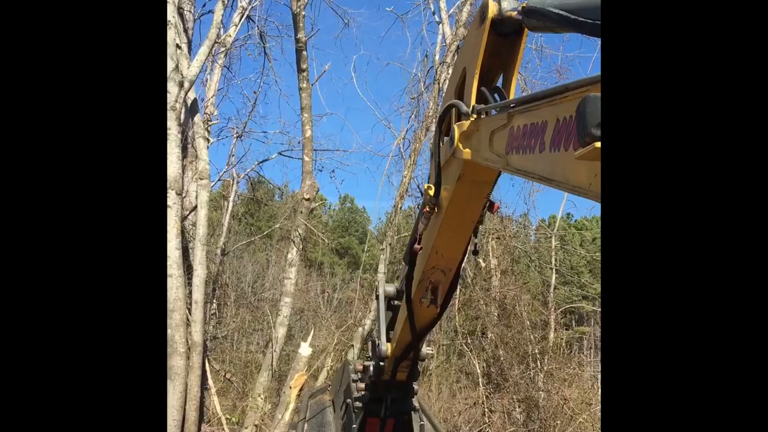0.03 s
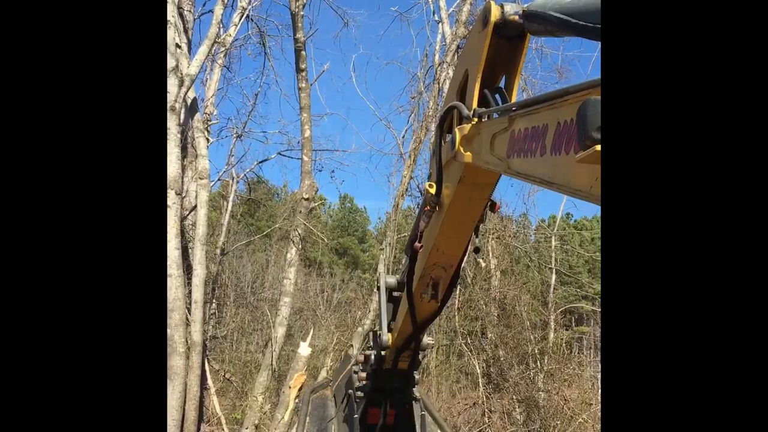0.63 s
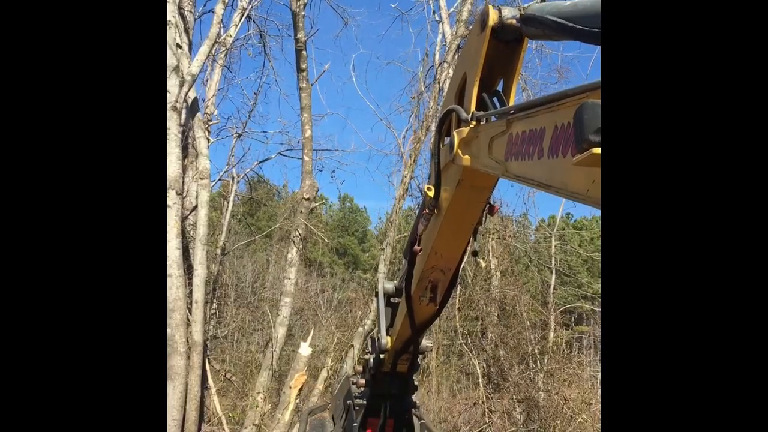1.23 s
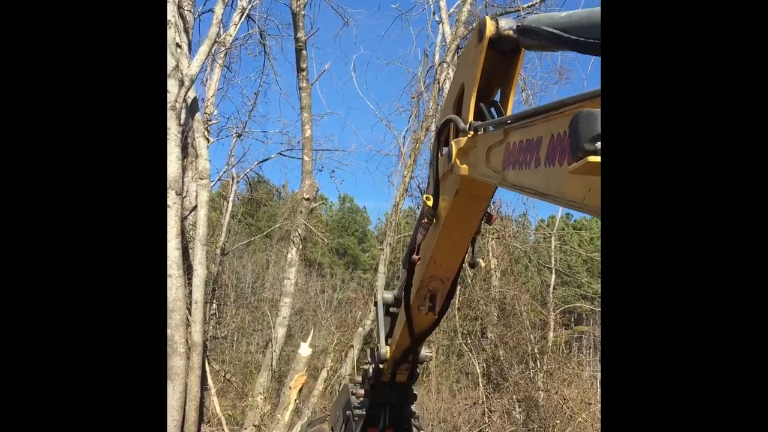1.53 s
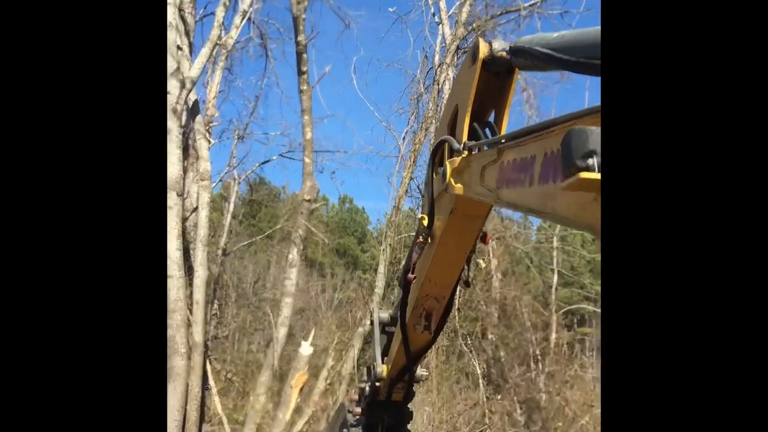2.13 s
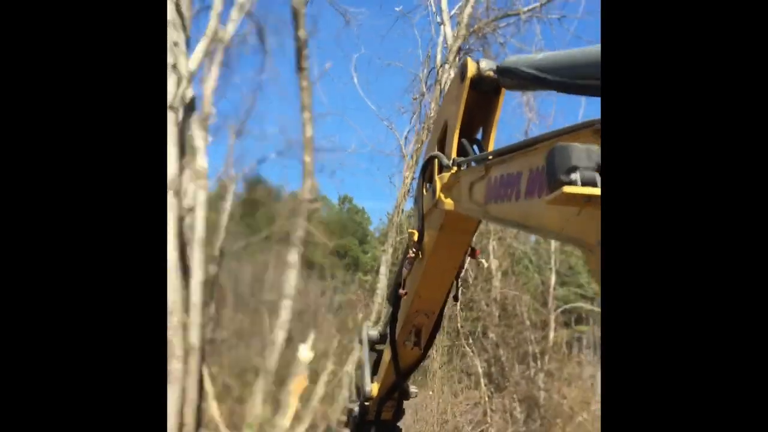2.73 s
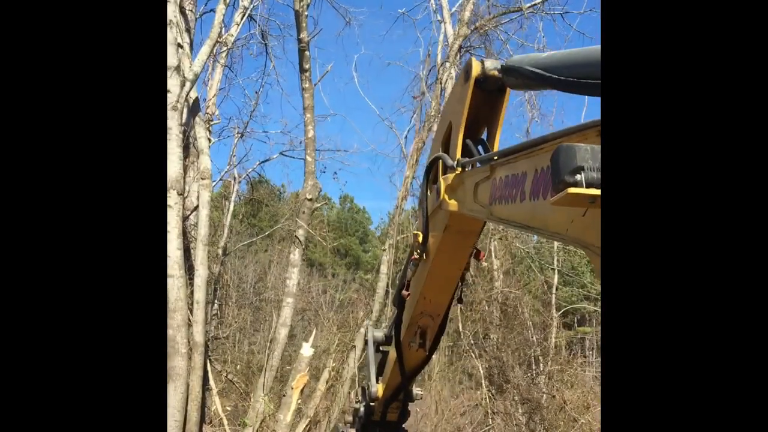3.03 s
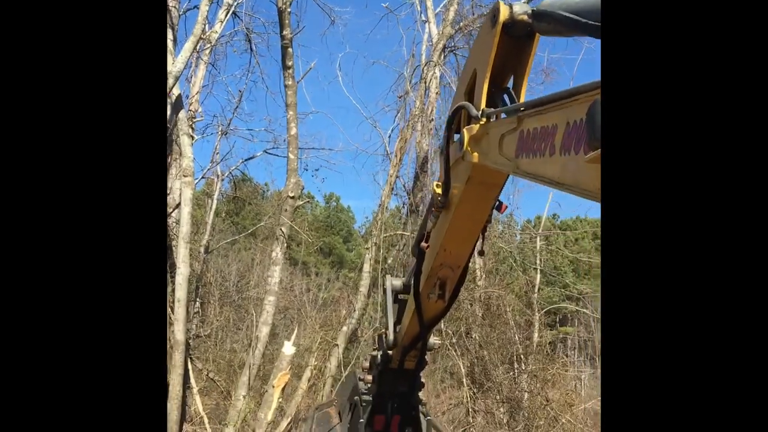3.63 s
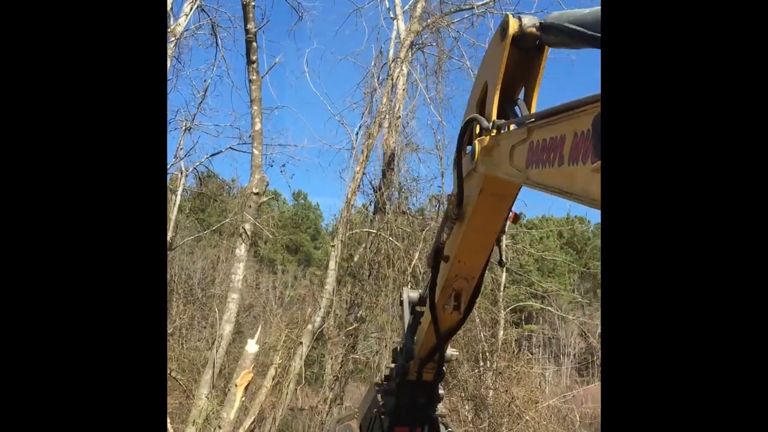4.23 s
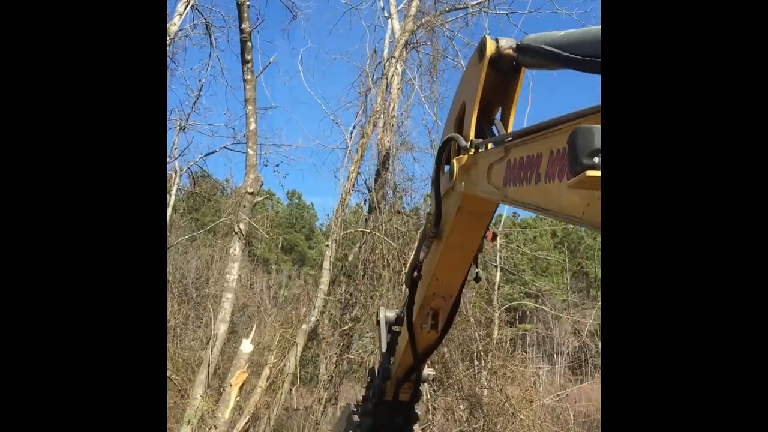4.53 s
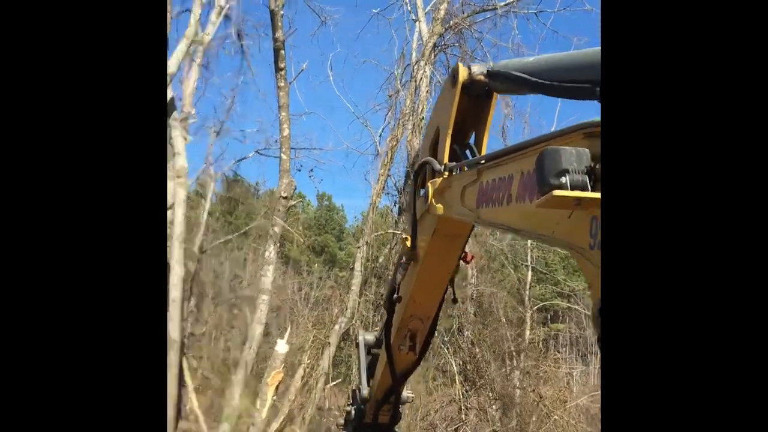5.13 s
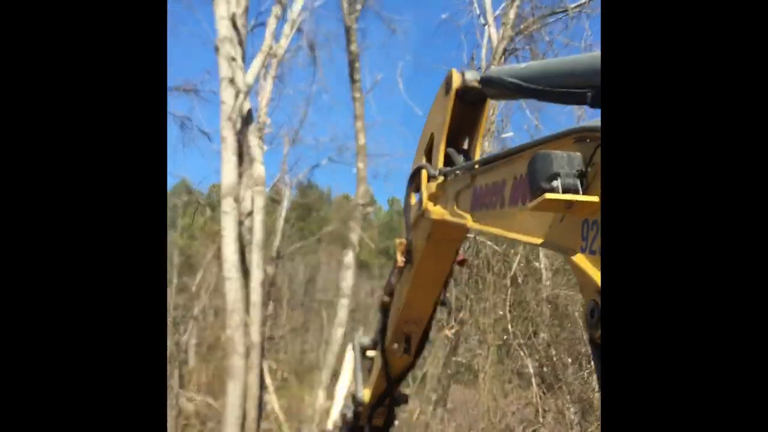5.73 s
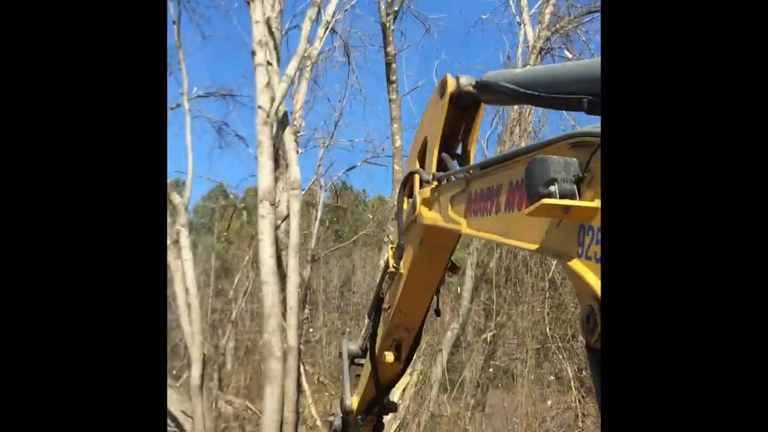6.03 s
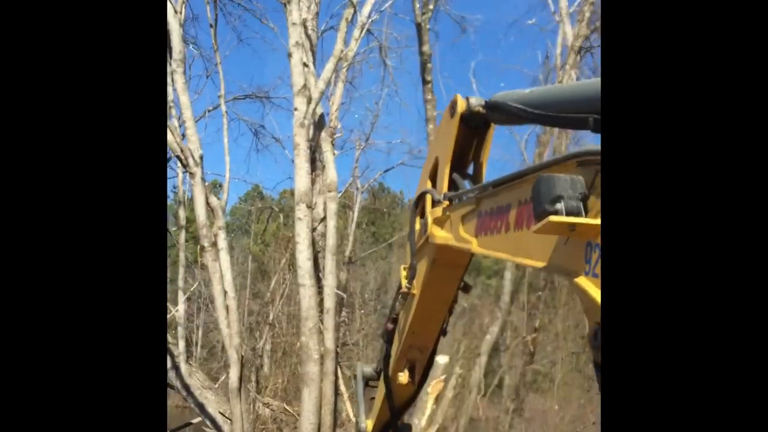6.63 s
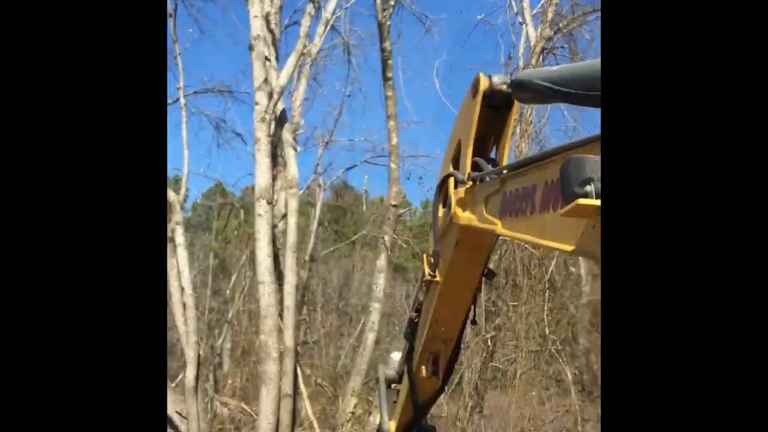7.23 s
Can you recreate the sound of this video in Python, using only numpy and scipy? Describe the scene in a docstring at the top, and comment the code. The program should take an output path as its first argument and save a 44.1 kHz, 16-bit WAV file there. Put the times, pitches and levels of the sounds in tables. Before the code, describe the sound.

A diesel excavator rumbles at a steady speed throughout, heard from beside its boom at the edge of a wood. In the first second its mulching drum lightly skims brush, with small twig ticks, two brief steel squeaks and a faint rising hydraulic whine. At about 1.9 seconds the drum bites into a small tree: the teeth hammer and shred, chips spray and the drum slows and shudders, heaviest around 2.5 seconds. Stems split and the cut ends near 3.3 seconds, leaving the engine, another faint whine and a few twig snaps. From about 5 seconds a second cut grinds on in uneven bursts, strongest from 5.6 to 6.2 seconds, with wood scraping on ringing steel. It eases slightly, then a stem splits with a loud crack near 7.2 seconds, and shredding continues to the end at about 7.5 seconds.

```python
"""At the edge of a wood, one microphone beside the boom of an excavator with a drum mulcher.
The four-cylinder diesel holds its speed while the drum skims the brush, then is twice pushed into
small trees: the teeth hammer and shred the wood, the drum bogs down and shudders, chips spray,
twigs snap and stems split. Close by, the hydraulics whine faintly and steel squeaks and rings;
boom, cab and trunks throw back short echoes."""
import sys
import numpy as np
from scipy import signal
from scipy.fft import rfft, irfft, next_fast_len
from scipy.io import wavfile

SR = 44100
rng = np.random.default_rng(int(sys.argv[2]) if len(sys.argv) > 2 else 0)


def dump(signal):
    """Clip the signal to [-1, 1] and save it as 16-bit WAV at the path in sys.argv[1]."""
    limited = np.clip(np.atleast_2d(signal).T, -1, 1)
    pcm = np.round(limited * 32767).astype(np.int16)
    wavfile.write(sys.argv[1], SR, pcm)


N = 330309
TIME = np.arange(N) / SR


def from_db(db):
    return 10 ** (np.asarray(db) / 20)


def unit_rms(x):
    return x / np.sqrt(np.mean(x ** 2) + 1e-20)


def curves(rows):
    """One curve for each column after the first, which is the time in seconds."""
    times, *columns = np.transpose(rows)
    return [np.interp(TIME, times, column) for column in columns]


def turns_of(hz):
    return np.cumsum(hz) / SR


def drift(hz):
    """Slow random wander with a spread of 1."""
    step, settle = 40, 2000
    pole = np.exp(-2 * np.pi * hz * step / SR)
    noise = rng.standard_normal(N // step + settle + 2)
    slow = signal.lfilter([1], [1, -2 * pole, pole ** 2], noise)[settle:]
    return np.interp(np.arange(N) / step, np.arange(len(slow)), unit_rms(slow))


def tone(turns, waver, waver_hz):
    """A sine of rms 1 that wavers in strength and phase."""
    angle = 2 * np.pi * (turns + rng.random())
    strength = 1 + waver * drift(waver_hz)
    return unit_rms(strength * np.sin(angle) + waver * drift(waver_hz) * np.cos(angle))


def grains(per_s, spread_db):
    """Random clicks of uneven size; rms 1."""
    sizes = from_db(spread_db * np.minimum(rng.exponential(1, N), 4))
    return unit_rms(sizes * rng.choice([-1, 1], N) * (rng.random(N) < per_s / SR))


def strokes(turns, decay_turns, uneven_db):
    """Envelope of one fading blow a turn, each of its own strength."""
    strength = from_db(uneven_db * np.clip(rng.standard_normal(N), -2, 2))
    return unit_rms(strength[turns.astype(int)] * np.exp(-(turns % 1) / decay_turns))


def swell(start, attack_s, hold_s, release_s):
    """Envelope that rises, holds and dies away."""
    age = TIME - start
    return np.clip(age / attack_s, 0, 1) * np.exp(-np.clip((age - attack_s - hold_s) / release_s, 0, 20))


def swells(rows, attack_s, release_s):
    return sum(from_db(db) * swell(start, attack_s, hold_s, release_s) for start, hold_s, db in rows)


def breaks(rows, crack_s, tail_s, tail_db):
    """Envelope of breaking wood: a sharp crack, then a tail of tearing fibres."""
    out = np.zeros(N)
    for start, db in rows:
        first = int(start * SR)
        age = TIME[:min(N - first, SR // 2)]
        tail = from_db(tail_db) * np.exp(-age / tail_s)
        out[first:first + len(age)] += from_db(db) * (np.exp(-age / crack_s) + tail)
    return out


def lagged(x, lag_s):
    """Follows x with inertia."""
    pole = np.exp(-1 / (lag_s * SR))
    return signal.lfilter([1 - pole], [1, -pole], x)


def patchy(x, depth_db, flare_hz):
    """Pieces of ever different size break off, so each half octave flares up on its own; rms 1."""
    size = next_fast_len(N, real=True)
    octaves = np.log2(np.clip(np.fft.rfftfreq(size, 1 / SR), 500, 16000) / 500)
    spectrum = rfft(x, size)
    bands = (irfft(spectrum * np.maximum(1 - abs(2 * octaves - k), 0), size)[:N] for k in range(11))
    return unit_rms(sum(band * from_db(depth_db * drift(flare_hz)) for band in bands))


# Resonances of cutter housing and boom. Each row: centre in Hz, width in Hz, lift in dB at full ringing.
STEEL_MODES = [(275.4, 28, 11), (362, 16, 5), (494.5, 35, 13), (580, 35, 6), (705, 45, 10), (865, 85, 2),
               (1205.5, 31, 11), (1356, 54, 9.5), (1615, 41, 9.5), (1790, 93, 7.5), (3030, 87, 5.5)]
def colour(x, spectrum, ringing):
    """Shapes x to a broad spectrum with a share of the steel resonances on top; rms 1."""
    size = next_fast_len(N + SR // 2, real=True)
    hz = np.maximum(np.fft.rfftfreq(size, 1 / SR), 1)
    points, levels = np.transpose(spectrum)
    broad_db = np.interp(np.log(hz), np.log(points), levels)
    steel_db = sum(lift / (1 + (2 * (hz - centre) / width) ** 2) for centre, width, lift in STEEL_MODES)
    # minimum phase, so the ringing follows each click
    cepstrum = irfft(np.log(from_db(broad_db + ringing * steel_db)), size)
    response = np.exp(rfft(2 * cepstrum[:size // 2], size))
    return unit_rms(irfft(rfft(x, size) * response, size)[:N])


def scatter(x, decay_s, echo_db):
    """Boom, cab and nearby trunks send the microphone small echoes that blur each click; rms 1."""
    age = TIME[:SR // 6]
    echoes = rng.standard_normal(len(age)) * (rng.random(len(age)) < .05) * np.exp(-age / decay_s)
    echoes *= from_db(echo_db) / np.sqrt(np.sum(echoes ** 2))
    # narrow obstacles throw back only the short waves
    highpass = signal.butter(2, 1900, "high", fs=SR, output="sos")
    return unit_rms(x + signal.sosfilt(highpass, signal.fftconvolve(x, echoes)[:N]))


# The diesel, running close by. Each row: time in seconds, crank turns per second.
CRANK_SPEED = [(0, 29.67), (2.0, 29.67), (2.6, 29.35), (3.3, 29.25), (3.65, 29.7), (7.49, 29.65)]
# Its tones above the exhaust boom. Each row: multiple of the crank speed, level in dB.
ENGINE_TONES = [(2.5, -53.5), (3.5, -36.5), (4, -30), (5, -41), (6, -28.5), (7, -53.5), (8.5, -44.5),
                (10, -41.5), (11.5, -49), (12, -46), (15, -46), (18, -53), (19, -43.5), (20, -58.5),
                (21, -47), (22, -49.5), (23, -47.5), (24, -46), (26, -58.5), (28, -49.5), (48, -53.5),
                (54, -54.5), (60, -52.5)]
# Noise of fan, block and pumps. Each row: frequency in Hz, relative density in dB.
BLOCK_SPECTRUM = [(20, -38.5), (42, 1.5), (115, 2), (150, -9.5), (275, -10), (330, -17.5), (680, -18),
                  (1000, -26.5), (1900, -27), (2600, -34.5), (3200, -34.5), (4800, -46.5), (5700, -38.5),
                  (7300, -52), (15500, -65)]
def diesel(load):
    """Two firings a turn pulse the block noise and give a boom that thins under load; the fan hums."""
    exhaust_db, load_dip_db, fan_hz = -12, 7.5, 124.3
    crank = turns_of(curves(CRANK_SPEED)[0])
    exhaust = from_db(exhaust_db - load_dip_db * load) * tone(2 * crank, waver=0.13, waver_hz=9.9)
    tones = sum(from_db(db) * tone(k * crank, waver=0.25, waver_hz=5.7) for k, db in ENGINE_TONES)
    clatter = rng.standard_normal(N) * (8.5 + strokes(2 * crank, decay_turns=0.89, uneven_db=7))
    fan = from_db(-29) * tone(fan_hz * TIME, waver=0.29, waver_hz=3.7)
    block = scatter(colour(clatter, BLOCK_SPECTRUM, ringing=0.27), decay_s=0.0082, echo_db=-8)
    return exhaust + tones + fan + from_db(-24) * block


# The drum, out at the end of the boom. Each row: time in seconds, turns per second.
CUTTER_SPEED = [(0, 50.5), (1.8, 54), (2.05, 46), (2.22, 46.6), (2.38, 44), (2.75, 42.8), (3.1, 37.7),
                (3.5, 44.6), (5.0, 50), (5.2, 47.4), (5.34, 40), (5.85, 42.5), (6.3, 43), (6.8, 42),
                (7.2, 49), (7.49, 44)]
def drum_turns():
    """Turns made by the drum as it bogs down in wood and recovers."""
    return turns_of(curves(CUTTER_SPEED)[0])


# Hum of the tooth rows. Each row: multiple of the drum speed, relative level in dB.
TOOTH_TONES = [(2, 0.5), (4, -3), (6, -2.5), (12, -18)]
# A trunk jams the drum and it lurches. Each row: start in seconds, hold in seconds, level in dB.
DRUM_LURCHES = [(2.33, .1, -16.5), (2.5, 0.029, -11), (2.65, .015, -17), (5.23, 0.12, -15.5),
                (5.79, 0.032, -28), (6.17, 0.052, -20), (7.41, 0.056, -15)]
# Even cutting makes the housing growl. Each row: start in seconds, hold in seconds, hum gain in dB.
HOUSING_GROWLS = [(2.1, 0.15, -19.5), (5.13, 0.026, -18.5)]
def drum(turns, load):
    """The drum shudders once a turn and its tooth rows hum, both louder under load."""
    free_shudder_db, loaded_shudder_db = -43.5, -20.5
    free_hum_db, loaded_hum_db = -42.5, -30
    lurches = swells(DRUM_LURCHES, attack_s=0.048, release_s=0.036)
    growls = swells(HOUSING_GROWLS, attack_s=0.065, release_s=0.046)
    shudder_gain = from_db(free_shudder_db) + from_db(loaded_shudder_db) * load + lurches
    hum_gain = from_db(free_hum_db) + from_db(loaded_hum_db) * load + growls
    shudder = tone(turns, waver=0.21, waver_hz=33)
    hum = sum(from_db(db) * tone(k * turns, waver=0.25, waver_hz=10) for k, db in TOOTH_TONES)
    return shudder_gain * shudder + hum_gain * hum


# Brush feeding in, one table a pass. Each row: time in seconds, shredding in dB, chip spray in dB.
SKIM_FEED = [(.25, -52, -70), (.4, -38, -52), (.62, -48, -63)]
FIRST_FEED = [(1.8, -55, -63), (1.93, -30.5, -36.5), (2.45, -24, -38), (3.0, -37, -40.5),
              (3.07, -42.5, -42.5), (3.13, -36.5, -40), (3.245, -36, -40), (3.32, -62, -70)]
SECOND_FEED = [(4.818, -55, -61), (4.97, -33, -44.5), (5.24, -33, -34), (5.45, -32, -39),
               (6.151, -25.5, -39), (6.34, -34.5, -50), (6.6, -35, -57), (6.78, -30, -39.5),
               (7.06, -30, -48), (7.49, -27, -41)]
# Bites into trunks. Each row: start and hold in seconds, then pounding, shredding and chip spray in dB.
TRUNK_BITES = [(2.02, 0.033, -24, -32, -54), (2.133, 0.098, -26.5, -47, -57),
               (2.226, 0.11, -19, -25.5, -38), (2.35, 0.058, -14, -30, -37),
               (2.44, 0.017, -10.5, -23.5, -31), (2.528, 0.064, -16.5, -37, -35),
               (2.687, 0.019, -19.5, -26.5, -36.5), (2.75, .025, -17, -22.5, -33),
               (2.912, .07, -19, -30.5, -39), (5.09, 0.033, -26, -25, -35.5),
               (5.148, 0.027, -23.5, -22.5, -32), (5.435, 0.03, -29, -29.5, -43),
               (5.562, 0.034, -20, -23, -32), (5.625, 0.05, -15, -18, -28.5),
               (5.745, 0.037, -14.5, -20, -37), (5.831, 0.087, -21, -20, -30),
               (5.99, 0.085, -23, -27.5, -40), (6.178, 0.035, -17, -20, -35.5),
               (6.388, 0.023, -26, -33, -50), (6.48, 0.017, -33, -32.5, -47), (6.604, 0.014, -33, -31, -51),
               (6.69, .02, -28, -31, -38), (6.84, 0.088, -31, -24.5, -41), (7.15, 0.052, -19, -18.5, -29.5),
               (7.27, 0.019, -28, -23.5, -37), (7.415, 0.02, -26, -27.5, -35.5)]
def cut_gains():
    """Strength of pounding, shredding and chip spray: a feed of brush with bites into trunks on top."""
    attack_s, release_s = 0.021, 0.061
    brush_pounding_db = 2.5  # relative to the shredding
    power = np.zeros((3, N))
    for feed in (SKIM_FEED, FIRST_FEED, SECOND_FEED):
        shred_db, spray_db = curves(feed)
        touching = (TIME >= feed[0][0]) & (TIME <= feed[-1][0] + release_s)
        power += touching * from_db([shred_db + brush_pounding_db, shred_db, spray_db]) ** 2
    for start, hold_s, *levels_db in TRUNK_BITES:
        power += np.outer(from_db(levels_db), swell(start, attack_s, hold_s, release_s)) ** 2
    return np.sqrt(power)


# The cut as heard from beside the boom. Each row: frequency in Hz, relative density in dB.
POUND_SPECTRUM = [(30, -34), (70, 5), (125, -0.5), (260, -3.5), (330, -12.5), (500, -17), (1050, -38.5),
                  (1700, -24.5), (2200, -25), (2900, -52)]
SHRED_SPECTRUM = [(150, -21.5), (330, -2.5), (700, 6), (1000, 0.5), (1450, -4), (1900, 3), (2350, 3.5),
                  (2700, -6), (4100, -5.5), (4900, -16), (6500, -12.5), (10000, -33.5)]
SPRAY_SPECTRUM = [(1500, -35), (3500, 3), (4900, -2), (6500, -0.5), (7600, -3.5), (8700, -2), (9900, -4.5),
                  (10400, -12.5), (11800, -8.5), (15500, -18)]
def cutting_teeth(turns, pound_gain, shred_gain, spray_gain):
    """The teeth pound the trunk, tear fibres and throw chips, biting harder once a turn."""
    uneven_feed = from_db(0.48 * drift(hz=27))
    bite = unit_rms(2.5 + strokes(turns, decay_turns=1, uneven_db=3.5)) * uneven_feed
    pounding = colour(bite * grains(per_s=3500, spread_db=2.5), POUND_SPECTRUM, ringing=1)
    fibres = colour(bite * grains(per_s=13000, spread_db=2), SHRED_SPECTRUM, ringing=0.91)
    chips = colour(bite * grains(per_s=20000, spread_db=3), SPRAY_SPECTRUM, ringing=0.47)
    shredding = patchy(scatter(fibres, decay_s=0.011, echo_db=-8), depth_db=1.5, flare_hz=18)
    spray = patchy(scatter(chips, decay_s=0.0073, echo_db=-7), depth_db=1.95, flare_hz=30)
    return pound_gain * pounding + shred_gain * shredding + spray_gain * spray


# Twigs in the brush. Each row: start in seconds, level in dB.
TWIG_SNAPS = [(.287, -53), (.312, -50), (.337, -49), (.385, -49), (.41, -49), (.458, -50), (.602, -53),
              (.626, -57), (1.87, -44), (3.001, -30.5), (3.429, -53), (3.818, -54), (4.109, -57),
              (4.206, -49), (4.857, -42), (4.955, -42), (5.566, -31.5), (6.41, -46), (6.51, -43)]
# Colour of a snap. Each row: frequency in Hz, relative density in dB.
TWIG_SPECTRUM = [(1500, -11), (4000, -6), (8500, 2), (12500, -3), (15500, -6.5)]
def snapping_twigs():
    """Thin twigs snap with a bright tick."""
    crackle = colour(grains(per_s=12000, spread_db=3), TWIG_SPECTRUM, ringing=0)
    ticks = patchy(crackle, depth_db=2.5, flare_hz=30)
    return ticks * breaks(TWIG_SNAPS, crack_s=0.0014, tail_s=0.029, tail_db=-4.5)


# The arm moves beside the microphone. Each row: start and hold in seconds, first pitch in Hz, level in dB.
ARM_WHINES = [(0.299, 0.99, 293, -44.5), (3.148, .35, 219, -42)]
def hydraulics():
    """The hydraulic motor's faint whine and its octave glide upward during each move of the arm."""
    rise_hz_per_s = 36
    out = np.zeros(N)
    for start, hold_s, hz, db in ARM_WHINES:
        turns = turns_of(hz + rise_hz_per_s * (TIME - start))
        whine = tone(turns, waver=0.32, waver_hz=4.6)
        octave = from_db(-2.5) * tone(2 * turns, waver=0.22, waver_hz=5)
        out += from_db(db) * swell(start, attack_s=0.22, hold_s=hold_s, release_s=0.22) * (whine + octave)
    return out


# Squeaks from the machine. Each row: peak time in seconds, pitch in Hz, length in seconds, level in dB.
STEEL_SQUEAKS = [(0.517, 1830, 0.076, -37), (0.67, 1770, .07, -42), (6.324, 14920, 0.031, -53),
                 (6.332, 11700, .025, -52), (6.39, 11500, .03, -56), (6.69, 14980, 0.029, -52)]
def squeaks():
    """Rubbing steel squeaks briefly, swelling and fading on an unsteady pitch."""
    out = np.zeros(N)
    for peak_s, hz, length_s, db in STEEL_SQUEAKS:
        envelope = np.exp(-(2 * (TIME - peak_s) / length_s) ** 2)
        turns = turns_of(hz * (1 + 0.012 * drift(hz=150)))
        out += from_db(db) * envelope * tone(turns, waver=0.24, waver_hz=37)
    return out


# A trunk grinds along the housing. Each row: start in seconds, hold in seconds, level in dB.
TRUNK_GRINDS = [(2.01, .08, -35), (2.235, 0.095, -28), (5.13, .03, -28.5), (5.87, 0.046, -33)]
# The band in which the housing sings. Each row: frequency in Hz, relative density in dB.
GRIND_SPECTRUM = [(1200, -36), (1580, -5), (1800, 1.5), (2000, -7), (2700, -36)]
def grinding():
    """Wood dragged over the steel keeps its upper resonances ringing."""
    singing = colour(grains(per_s=3000, spread_db=0.5), GRIND_SPECTRUM, ringing=0.9)
    return singing * swells(TRUNK_GRINDS, attack_s=0.026, release_s=0.057)


# Stems giving way at the end of the boom. Each row: start in seconds, level in dB.
STEM_SPLITS = [(2.703, -34), (2.79, -28), (2.86, -30), (3.0, -25), (5.566, -32), (5.62, -26), (5.835, -20),
               (6.207, -24), (7.161, -14), (7.172, -20), (7.282, -23), (7.427, -30)]
def splitting_stems():
    """Stems split against the housing and set it ringing."""
    splinters = colour(grains(per_s=8000, spread_db=1.5), SHRED_SPECTRUM, ringing=0.99)
    return splinters * breaks(STEM_SPLITS, crack_s=0.018, tail_s=0.054, tail_db=-11.5)


def scene():
    """All that reaches the microphone, in mono. The pounding sets the load on drum and engine."""
    full_load_db = -11
    pound_gain, shred_gain, spray_gain = cut_gains()
    load = lagged(pound_gain, lag_s=0.097) / from_db(full_load_db)
    turns = drum_turns()
    machine = diesel(load) + drum(turns, load) + hydraulics() + squeaks()
    cut = cutting_teeth(turns, pound_gain, shred_gain, spray_gain)
    return (machine + cut + snapping_twigs() + grinding() + splitting_stems())[None, :]


def record(dry):
    """The highest peaks are rounded off and the top treble is cut."""
    cutoff_hz = 15700
    rounded = dry / (1 + dry ** 8) ** (1 / 8)
    return signal.sosfilt(signal.ellip(12, .1, 90, cutoff_hz, fs=SR, output="sos"), rounded)


dry = scene()
out = record(dry)
dump(out)
```